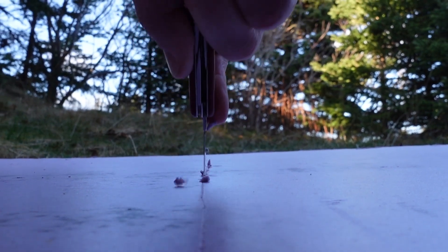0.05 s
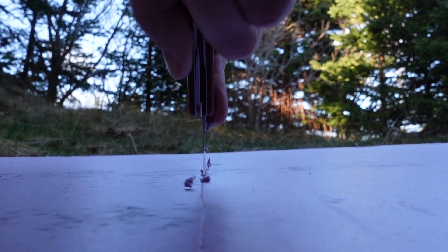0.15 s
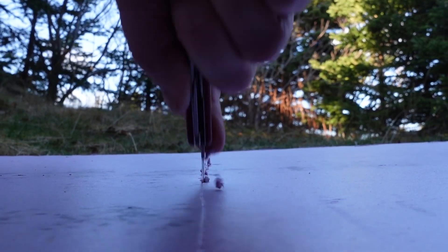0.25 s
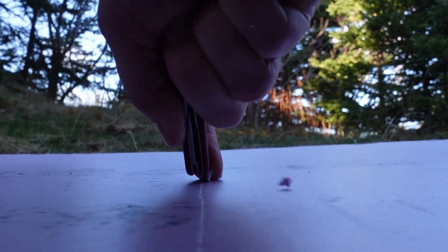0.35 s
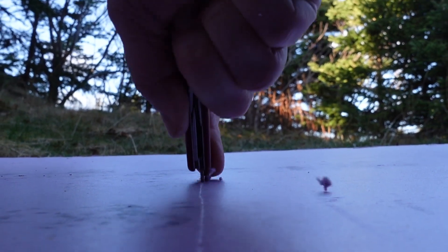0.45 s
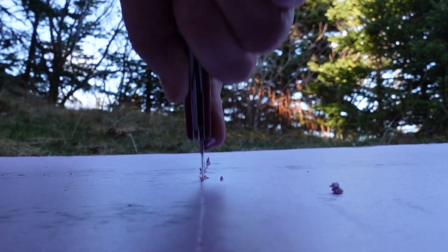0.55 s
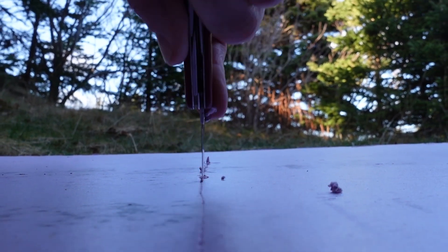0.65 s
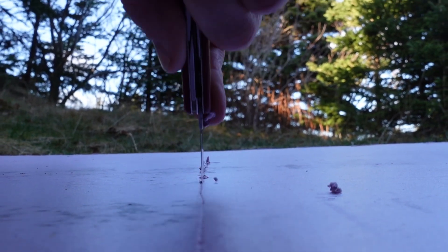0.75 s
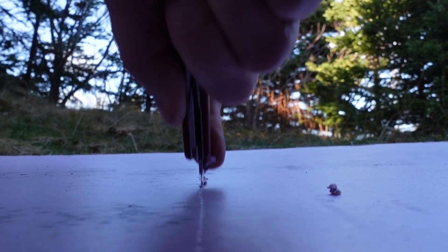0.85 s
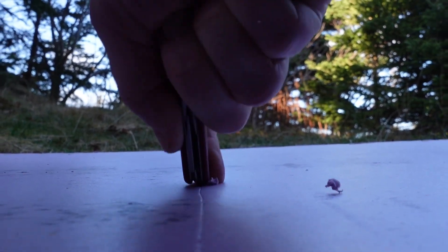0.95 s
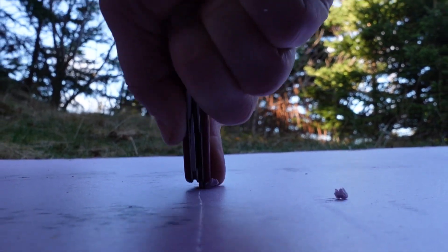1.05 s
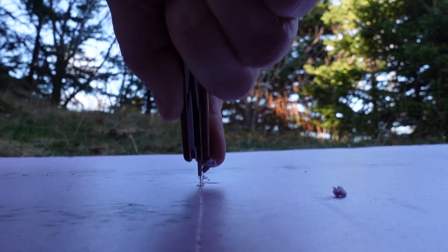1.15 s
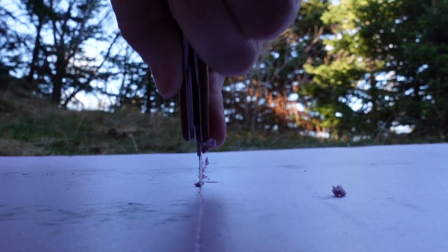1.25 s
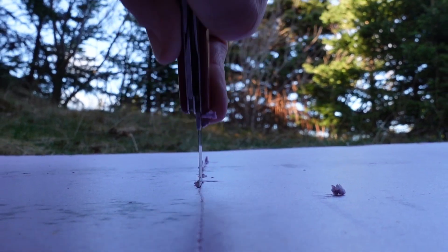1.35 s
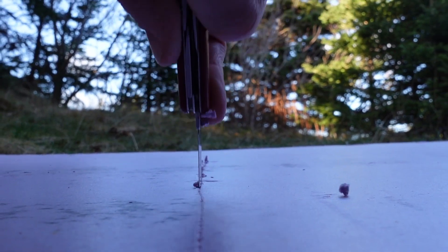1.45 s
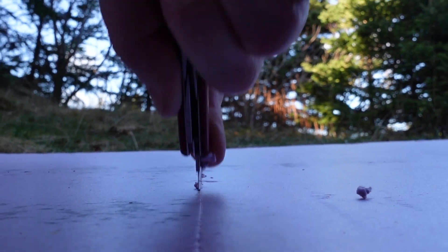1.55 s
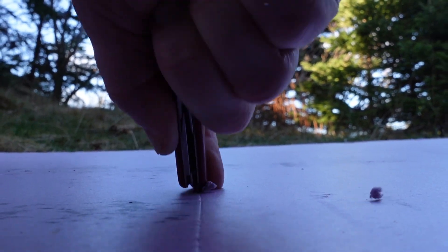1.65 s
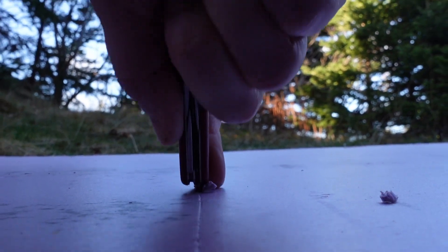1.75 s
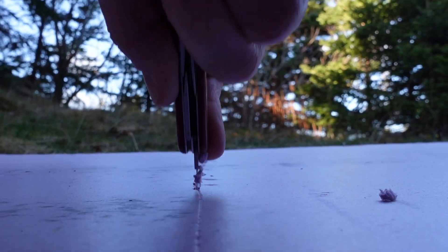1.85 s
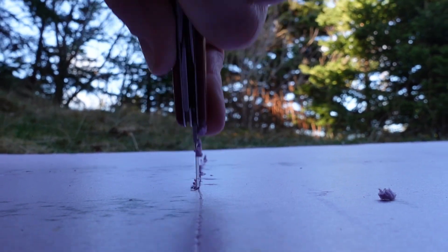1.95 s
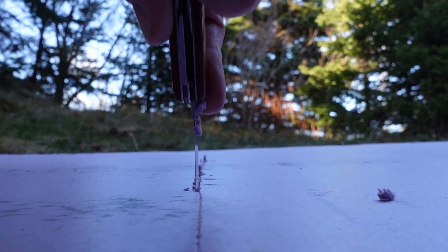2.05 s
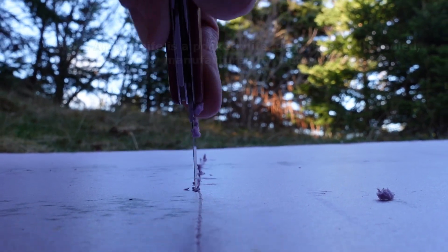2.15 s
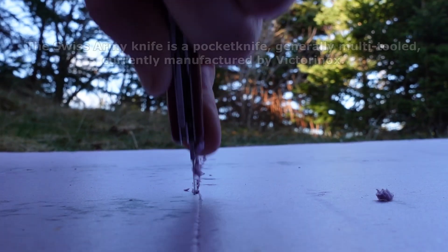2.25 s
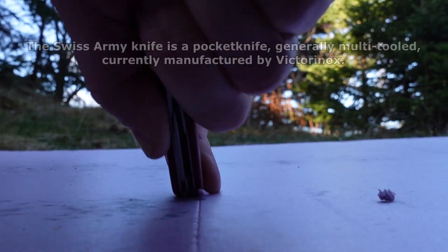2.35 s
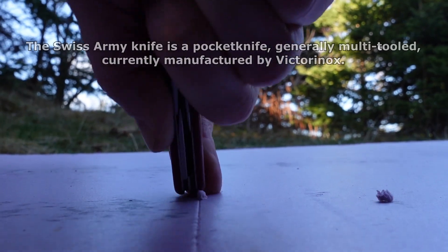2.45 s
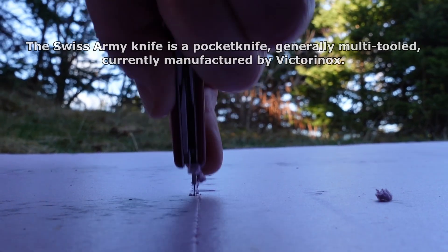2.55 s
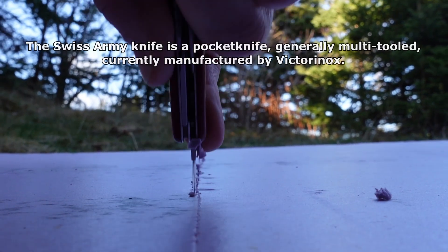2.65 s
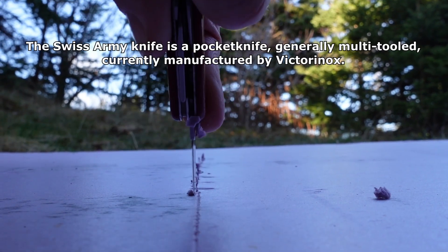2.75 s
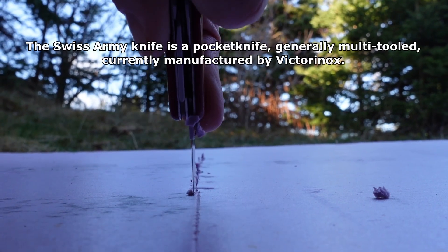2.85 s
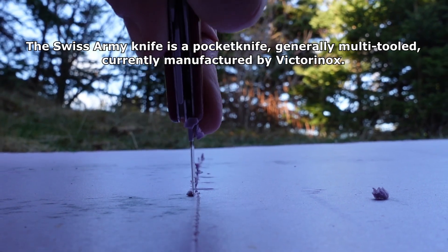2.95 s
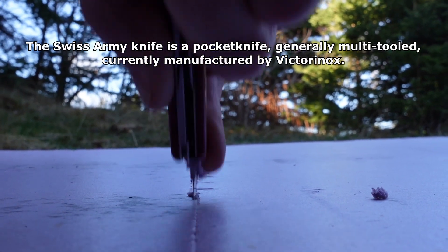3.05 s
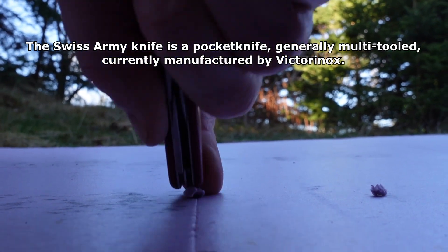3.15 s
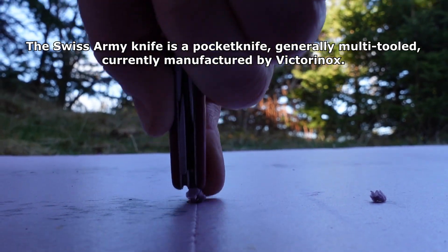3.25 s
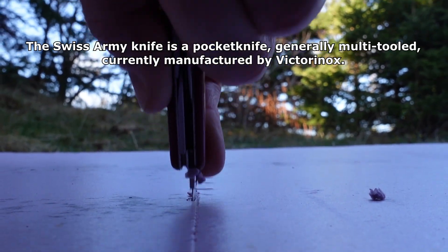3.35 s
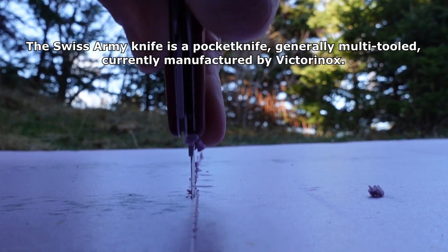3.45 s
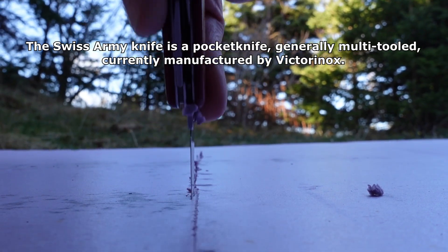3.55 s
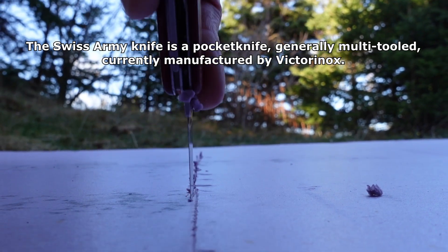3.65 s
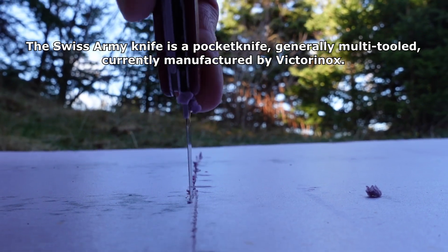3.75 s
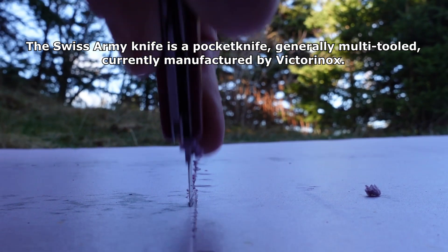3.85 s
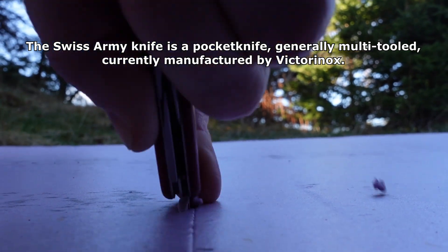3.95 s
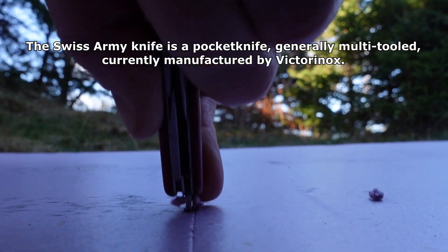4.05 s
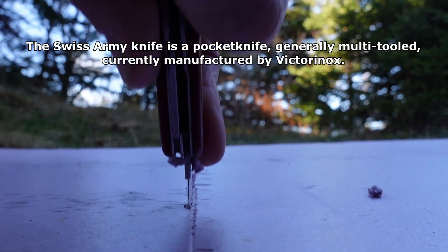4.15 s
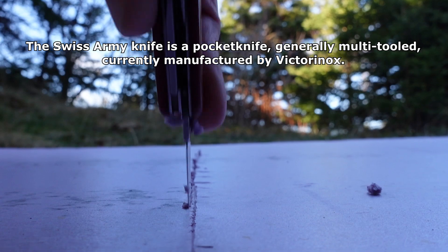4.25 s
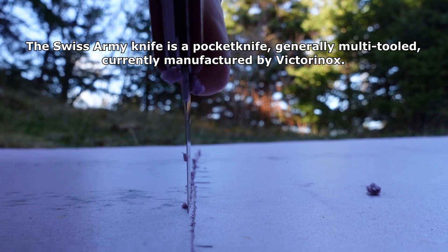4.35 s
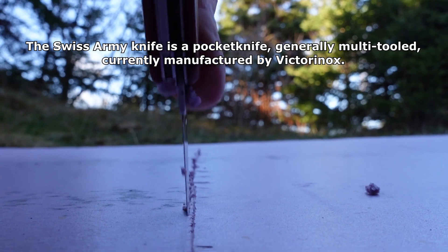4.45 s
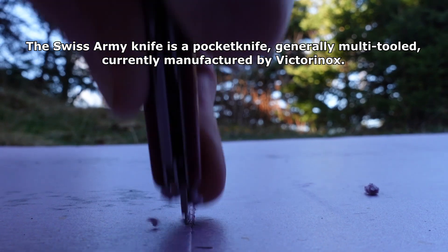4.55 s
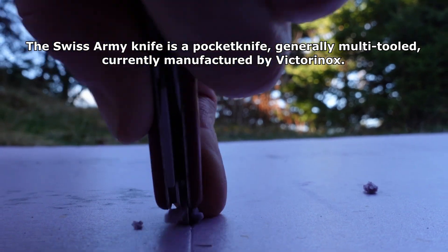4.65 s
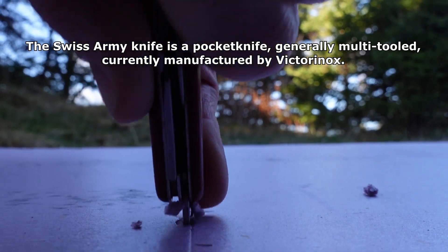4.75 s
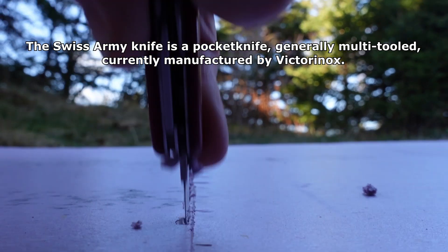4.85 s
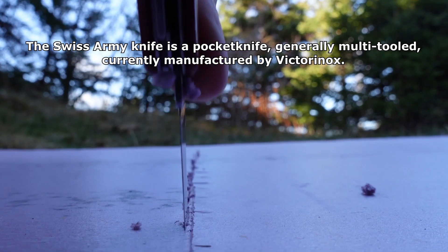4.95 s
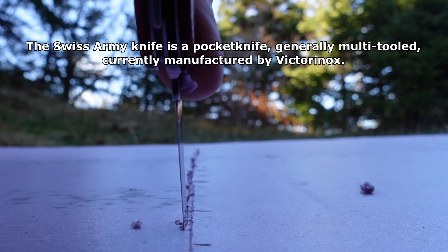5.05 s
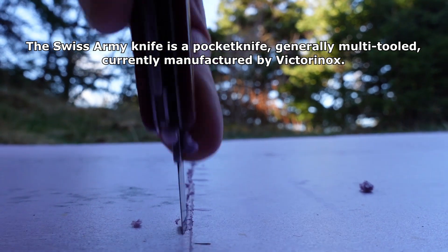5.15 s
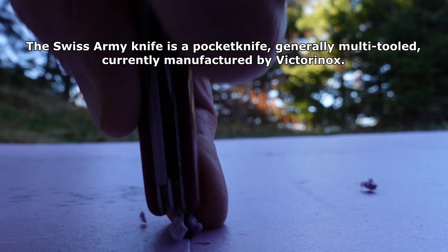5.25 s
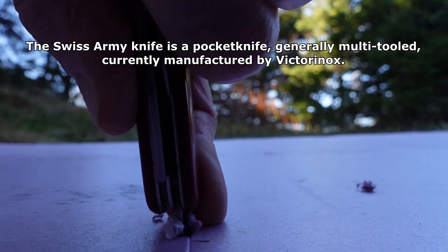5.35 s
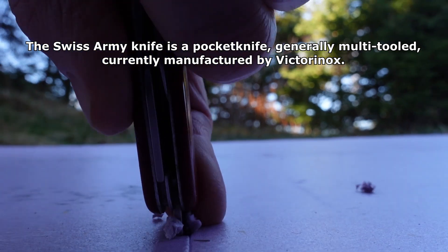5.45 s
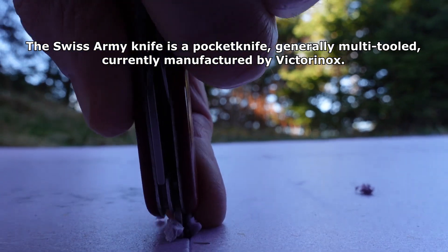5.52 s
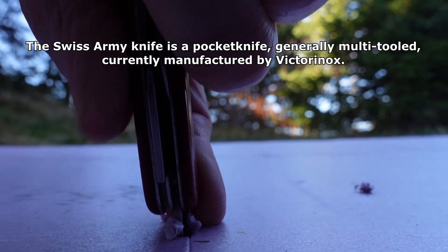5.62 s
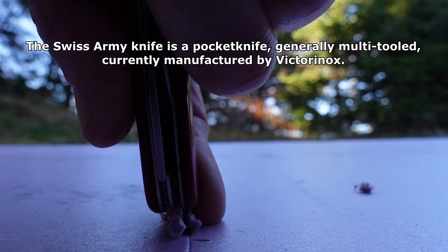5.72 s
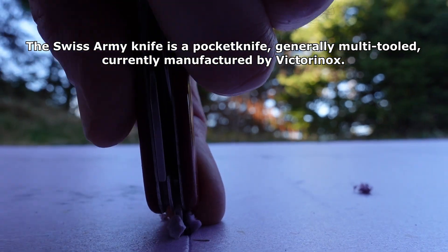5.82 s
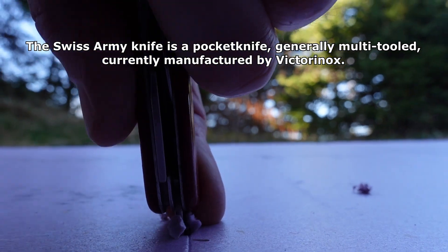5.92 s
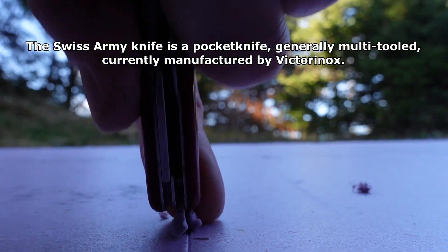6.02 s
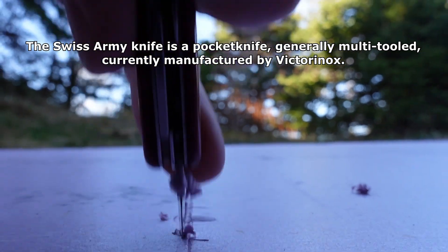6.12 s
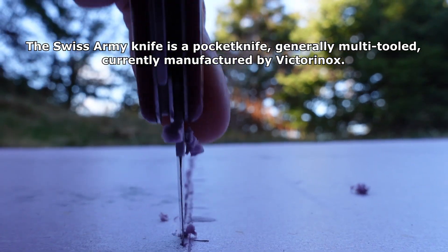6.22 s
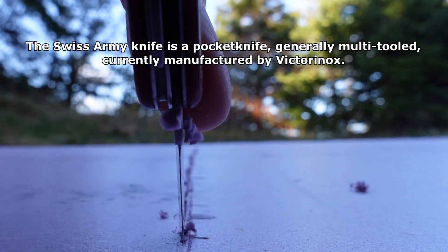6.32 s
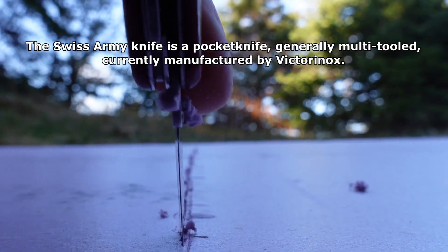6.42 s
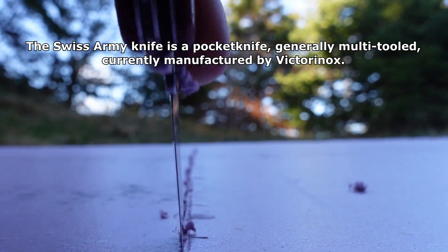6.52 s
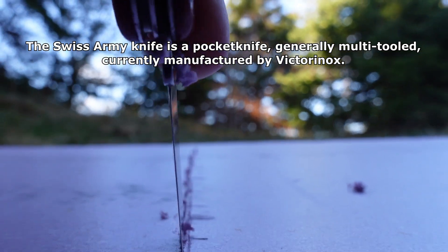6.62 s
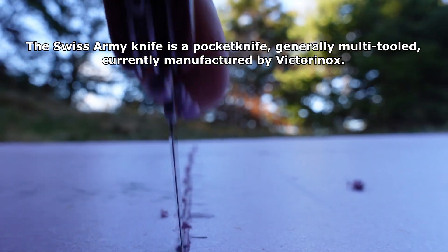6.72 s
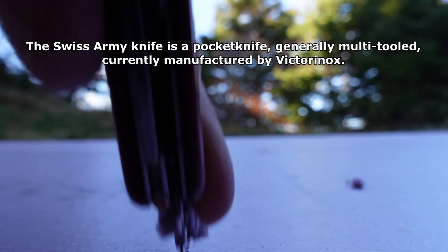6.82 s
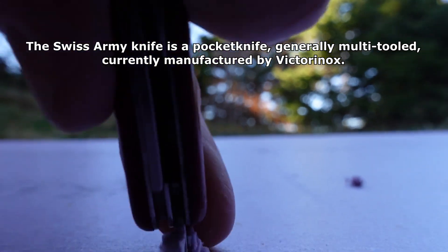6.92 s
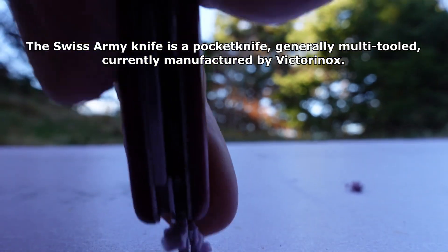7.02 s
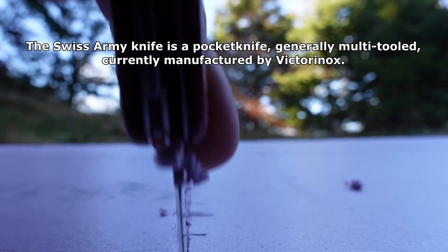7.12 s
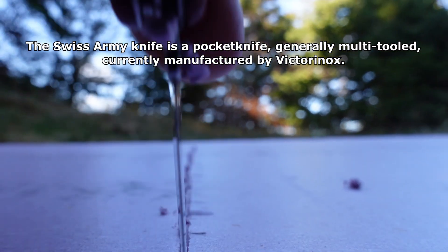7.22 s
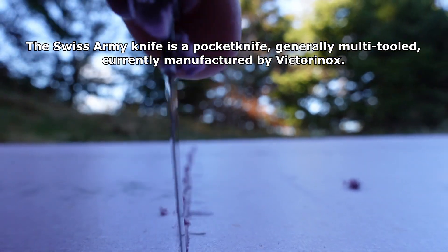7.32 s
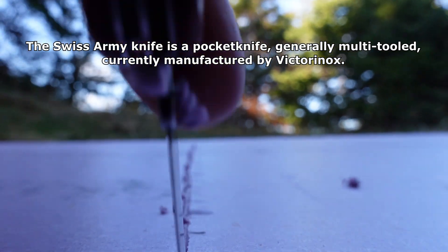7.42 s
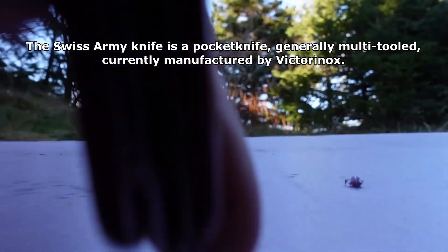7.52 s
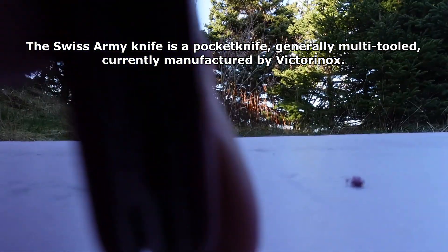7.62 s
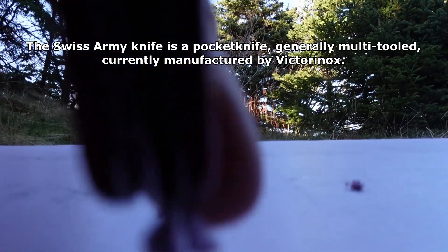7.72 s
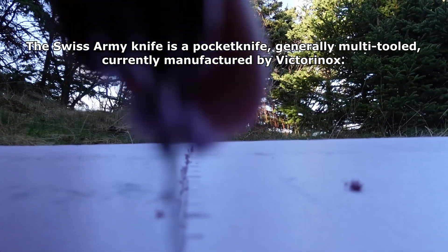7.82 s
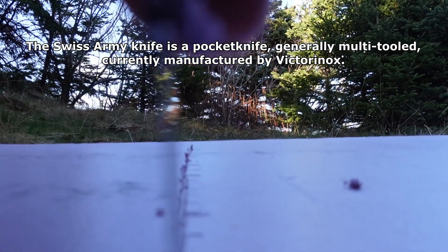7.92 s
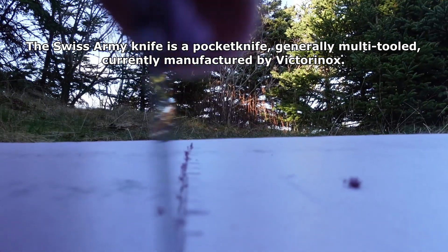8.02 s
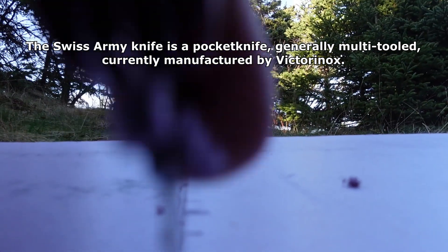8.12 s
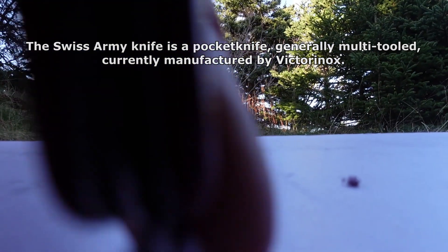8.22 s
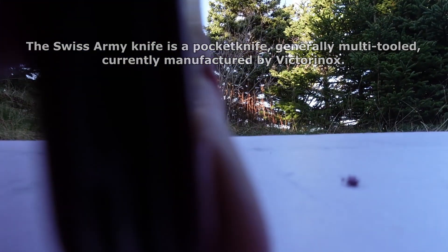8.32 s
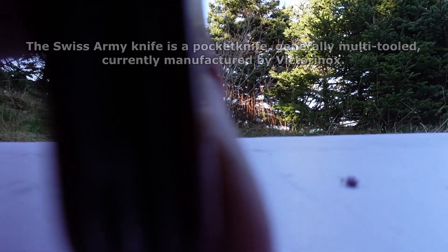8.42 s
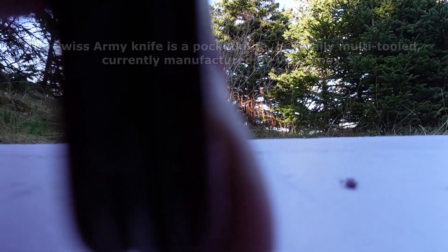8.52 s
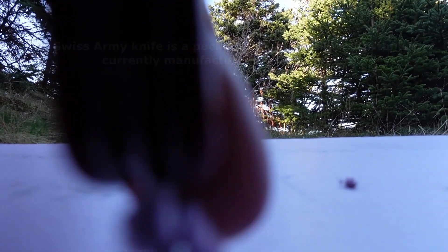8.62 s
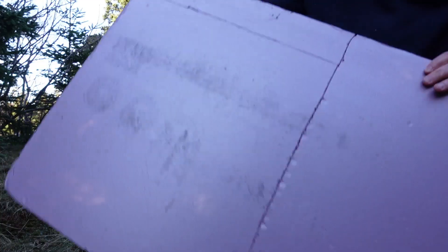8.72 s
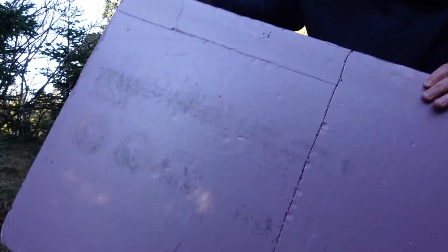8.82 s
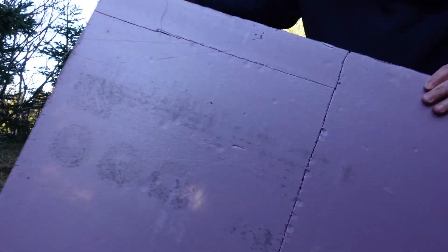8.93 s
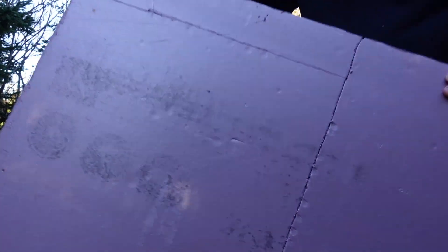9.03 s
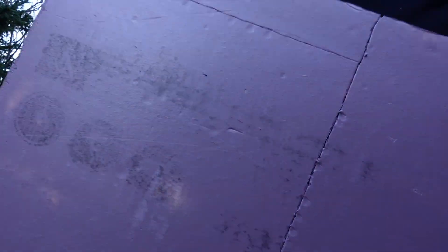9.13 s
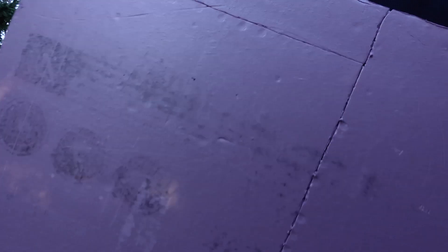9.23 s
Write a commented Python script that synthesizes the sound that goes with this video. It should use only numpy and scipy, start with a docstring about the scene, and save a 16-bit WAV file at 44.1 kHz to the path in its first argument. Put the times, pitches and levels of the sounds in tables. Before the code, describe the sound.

Harsh gritty foam sawing in steady strokes, squeaky at each reversal, pauses once, cracks free, continues nearer, then the board bumps.

```python
"""A pocket knife saws up and down through a rigid foam board, outdoors, working its way towards the microphone.
Each stroke bursts foam cells: uneven clicks and rubbing noise, coloured by the board, make a grating scrape.
As the blade speeds up and slows down it sticks and slips: wavering tones make a gliding squeak.
Noise bursts make snaps of foam, and dying tones make knocks on the board, over still air.
The blade rests once and cracks free; at the end the board is shifted and bumped, and a low drone joins in."""
import sys
import numpy as np
from scipy import signal
from scipy.fft import rfft, irfft, next_fast_len
from scipy.io import wavfile
from scipy.ndimage import uniform_filter1d

SR = 44100
rng = np.random.default_rng(int(sys.argv[2]) if len(sys.argv) > 2 else 0)


def master(y):
    """Save y as 16-bit WAV."""
    cut = np.clip(np.atleast_2d(y).T, -1, 1)
    pcm = np.round(cut * 32767)  # scale
    wavfile.write(sys.argv[1], SR, pcm.astype(np.int16))


N = 409248  # length in samples
TIME = np.arange(N) / SR  # seconds
BINS = np.fft.rfftfreq(4096, 1 / SR)  # Hz at which every filter is drawn

# Strokes of the blade, down and up; the levels are settings before each sound's trims: start t/s,
# speeding-up time/s, end t/s, slowing-down time/s, rasp setting off level/dB, squeal gaining speed level/dB,
# squeal stopping level/dB, scrape early, midway and late level/dB, crunch over scrape/dB, hiss over scrape/dB
STROKES = [(0, 0.012, 0.46, 0.027, -20, -21, -20, -28, -28, -18, -4, -2),
           (0.503, 0.044, 0.779, 0.025, -18.5, -21.5, -24.0, -32.0, -30.5, -23.5, -5.0, 3.5),
           (0.804, 0.03, 1.033, 0.023, -26.5, -19.5, -19.5, -20.5, -22.0, -20.0, -1.5, -2.5),
           (1.086, 0.058, 1.481, 0.014, -17.0, -18.0, -21.0, -29.5, -31.0, -26.0, -4.0, 0.5),
           (1.53, 0.022, 1.76, 0.039, -21.5, -20.0, -17.5, -22.5, -21.5, -19.5, -1.5, -2.0),
           (1.808, 0.058, 2.177, 0.015, -18.5, -19.5, -20.5, -23.0, -30.5, -27.5, -5.0, 1.0),
           (2.214, 0.034, 2.466, 0.039, -24.0, -19.0, -19.5, -20.5, -23.0, -17.5, -3.0, -2.5),
           (2.51, 0.071, 2.871, 0.042, -17, -18.0, -20.0, -23.5, -27.5, -25.5, -5.0, 0.5),
           (3.05, 0.039, 3.234, 0.029, -23.5, -20.0, -21.0, -20.0, -19.5, -18.5, -3.5, -4.0),
           (3.28, 0.081, 3.792, 0.041, -17, -16, -18, -34, -35, -32, -5, 3),
           (3.849, 0.032, 4.049, 0.017, -29.5, -21.5, -20.5, -22.5, -24.0, -23.0, -1.5, -3.0),
           (4.096, 0.05, 4.465, 0.024, -17.0, -17.5, -23.5, -30.5, -33.0, -27.5, -1.5, 0.0),
           (4.511, 0.018, 4.704, 0.021, -24.0, -20.0, -22.0, -25.0, -21.5, -19.5, -2.0, -4.5),
           (4.777, 0.077, 5.086, 0.02, -19, -22, -22.5, -32, -32.5, -31.0, -1.5, 2.0),
           (5.126, 0.031, 5.402, 0.054, -25.5, -21.5, -20.5, -24.0, -24.0, -21.0, -1.5, -3.0),
           (6.049, 0.101, 6.381, 0.032, -19.0, -18.0, -17.0, -27.0, -26.5, -30.0, -3.0, -1.0),
           (6.391, 0.056, 6.676, 0.039, -15, -19, -19, -38, -38, -37, -4, 1),
           (6.752, 0.025, 6.987, 0.015, -26.0, -20.5, -18.5, -21.0, -25.5, -23.0, -5.0, -5.0),
           (7.056, 0.056, 7.353, 0.023, -16, -16, -19.5, -34.5, -33.0, -32.0, -4.0, 0.0),
           (7.428, 0.034, 7.678, 0.06, -28.0, -22.5, -19.0, -26.0, -25.0, -17.0, -2, -2.0),
           (7.741, 0.042, 8.03, 0.035, -16.5, -19.0, -20.0, -33.0, -35.0, -34.0, -4.5, 0.5),
           (8.083, 0.04, 8.434, 0.049, -22.0, -19.0, -16.0, -29.0, -28.0, -30.0, -2.5, -1.0),
           (8.556, 0.092, 8.763, 0.031, -16.0, -18.5, -17.5, -38.0, -32.5, -30.5, -5.0, -2.5)]
# Stray chirps where the blade catches: start t/s, end t/s, start f/Hz, middle f/Hz, end f/Hz,
# first half level/dB, second half level/dB
CHIRPS = [(0.186, 0.195, 9000, 3920, 2590, -23, -23), (.215, 0.224, 3600, 5530, 8950, -17.5, -23),
          (0.566, 0.68, 10300, 10290, 11500, -29.5, -33), (0.63, 0.654, 7400, 6070, 4940, -20, -28),
          (0.669, 0.68, 8750, 8450, 10000, -26, -17.5), (.723, 0.762, 16200, 15100, 10900, -19, -27),
          (2, 2.025, 14800, 14500, 13600, -23, -37), (2.893, 2.939, 560, 760, 1230, -20.5, -33),
          (2.933, 2.978, 754, 1540, 750, -23, -27), (3.168, 3.187, 14470, 11980, 11510, -32, -31),
          (3.288, 3.32, 1047, 1280, 1870, -28, -21), (3.355, 3.417, 4200, 5920, 6540, -18.5, -18.5),
          (3.418, 3.461, 5130, 7600, 8430, -25.5, -28), (3.637, 3.677, 12900, 8260, 7890, -23.5, -18),
          (3.677, 3.72, 8150, 10900, 12000, -20, -28), (4.745, 4.778, 920, 1007, 1460, -28, -20),
          (4.775, 4.817, 736, 1070, 2270, -16.5, -27), (4.832, 4.887, 6440, 7330, 7120, -20.5, -24),
          (6.071, 6.103, 1530, 1767, 2200, -24, -28), (6.142, 6.186, 2180, 8960, 15400, -29, -24),
          (6.485, 6.524, 11550, 6700, 5080, -23.5, -20), (6.52, 6.543, 3800, 6650, 8000, -22, -16.5),
          (7.108, 7.13, 8100, 10540, 13000, -24, -25.5), (8.118, 8.152, 9600, 11700, 13200, -25, -29),
          (8.061, 8.125, 2115, 2300, 2330, -29.5, -33), (8.551, 8.593, 1288, 1385, 1620, -27, -16)]
# slips a second: as the blade sticks, once up to speed, and as it starts to brake
STICK_HZ, SET_OFF_HZ, BRAKE_HZ = 1001.7, 8210, 10330


def amp(db):
    """Turns decibels into gain."""
    return 10 ** (np.asarray(db) / 20)


def evened(x):
    """Scales a sound to rms 1."""
    return x / np.sqrt(np.mean(x ** 2) + 1e-20)


def read(points, hz):
    """Reads a spectrum between its points, on a log-frequency axis."""
    f, value = np.transpose(points)
    return np.interp(np.log(hz + 1), np.log(f + 1), value)


def add(mix, s, sound):
    """Adds a sound to the mix at time s."""
    part = mix[max(round(s * SR), 0):][:len(sound)]
    part += sound[:len(part)]


def power(x, seconds):
    """Running mean square, smoothed twice."""
    size = max(int(seconds * SR), 1)
    once = uniform_filter1d(x ** 2, size)
    return abs(uniform_filter1d(once, size)) + 1e-14


def wander(count, hz):
    """Random drift of about rms 1 that heads for a new value hz times a second."""
    at = np.arange(count) * hz / SR
    knots = rng.standard_normal(int(at[-1]) + 2)
    return np.interp(at, np.arange(len(knots)), knots) * np.sqrt(3 / 2)


def colour(x, gain):
    """Filters with the given gain on BINS, without sounding ahead: it rings only after a click."""
    both_sides = np.r_[gain, gain[-2:0:-1]]
    log_gain = np.log(np.maximum(both_sides, 1e-5))
    taps = np.fft.ifft(np.exp(np.conj(signal.hilbert(log_gain)))).real
    return signal.oaconvolve(x, taps)[:len(x)]


def split(x):
    """Splits into crunch (to 800 Hz), grating (to 3200 Hz) and hiss, which sum to the whole."""
    size = next_fast_len(N)
    z, hz = rfft(x, size), np.fft.rfftfreq(size, 1 / SR)
    low = 1 / (1 + (hz / 800) ** 6)
    middle = 1 / (1 + (hz / 3200) ** 6)
    return [irfft(z * band, size)[:N] for band in (low, middle - low, 1 - middle)]


def ripple(x, echo_db, reach_s=.007, count=7):
    """Echoes inside the sheet comb the sound; their paths change as the cut advances."""
    out = np.zeros(N)
    for k in range(count):
        taps = np.zeros(int(reach_s * SR) + 40)
        taps[rng.integers(30, len(taps), size=12)] = rng.choice([-1, 1], size=12)
        # one set of paths fades into the next
        near = np.sqrt(np.maximum(1 - abs(np.linspace(0, count - 1, N) - k), 0))
        out += near * signal.oaconvolve(x, taps / np.linalg.norm(taps))[:N]
    treble = signal.sosfilt(signal.butter(1, 1200, "high", fs=SR, output="sos"), out)
    return (x + amp(echo_db) * treble) / np.sqrt(1 + amp(echo_db) ** 2)


def background(air_db=-56.5, drone_hz=106.7, drone_db=-44.5):
    """Still air as coloured noise, and an unsteady low sine drone while the board is held up."""
    # still air outdoors: f/Hz, level per Hz/dB, before evening
    air_spectrum = [(20, 7), (50, -15), (110, -5), (300, -8), (1000, -35), (4000, -10), (16000, -33)]
    drone = evened(np.sin(2 * np.pi * drone_hz * TIME)) * amp(drone_db + 1.5 * wander(N, 15))
    air = evened(colour(rng.standard_normal(N), amp(read(air_spectrum, BINS))))
    return amp(air_db) * air + drone * np.interp(TIME, [8.8, 9.0], [0, 1])


def knocks(level_db=-2.0, boom_db=3., boom_hz=104, boom_t60=0.33):
    """A blow rings the board's short modes as dying tones, and the whole sheet booms a little longer."""
    # blows on the board, before the two trims above: t/s, ring peak level/dB, boom of the whole sheet level/dB
    blow_table = [(0.983, -4.5, -35), (1.702, -6.5, -31.5), (2.404, -7.5, -30.5), (3.19, -8.5, -37),
                  (4.015, -6, -32.5), (5.322, -12, -34.5), (5.715, -7.5, -49), (8.954, -7.5, -27)]
    # what the struck board rings with, pitch before a small random change: f/Hz, level/dB, time to fall 60 dB/s
    mode_table = [(184.7, -6, 0.15), (264, -2.5, 0.12), (306, -5.5, 0.053), (414, -11, 0.06),
                  (551, -5, 0.12), (625, -14, 0.023), (880, -20, .05)]
    out, t = np.zeros(N), np.arange(SR // 2) / SR
    for s, db, sheet_db in blow_table:
        ring = np.zeros(len(t))
        for hz, mode_db, t60 in mode_table:
            struck_hz = hz * rng.uniform(0.92, 1.04)
            ring += amp(mode_db - 60 * t / t60) * np.cos(2 * np.pi * struck_hz * t)
        boom = amp(sheet_db + boom_db - 60 * t / boom_t60) * np.sin(2 * np.pi * boom_hz * t)
        add(out, s, amp(db + level_db) * ring / abs(ring).max() + boom)
    return out


def snaps(t60=0.011, octaves=1.78):
    """A wall of cells gives way: a noise burst round one pitch, a sharp crack that dies at once."""
    # single snaps of foam: t/s, peak level/dB, centre f/Hz
    snap_table = [(0.98, -5, 1100), (1.699, -5, 635), (2.402, -7, 616), (2.472, -12, 1560),
                  (2.916, -7, 856), (2.929, -12, 1550), (3.193, -5, 1200), (3.245, -31, 2220),
                  (3.26, -26, 1060), (4.014, -9, 519), (4.805, -9, 1740), (4.816, -12, 746),
                  (5.321, -6, 390), (5.445, -18, 1660), (5.502, -17, 1650), (5.528, -18, 1640),
                  (5.552, -22.5, 1620), (5.572, -37, 1660), (5.672, -12, 1810), (5.681, -8, 1210),
                  (5.703, -15, 900), (5.73, -10.5, 417), (8.773, -9, 8790), (8.863, -10.5, 520),
                  (9.105, -34, 571)]
    out, t = np.zeros(N), np.arange(len(BINS)) / SR
    for s, db, hz in snap_table:
        burst = rng.standard_normal(len(t)) * amp(-60 * t / t60)
        distance = np.log2((BINS + 1) / hz) / octaves
        crack = colour(burst, 1 / (1 + distance ** 2) ** 2)
        add(out, s, amp(db) * crack / abs(crack).max())
    return out


def rising(t, start, rise):
    """Slip rate in Hz as the blade sets off: the hand pushes harder and harder."""
    run_up = np.maximum(t - start, 0) / rise
    return STICK_HZ + (SET_OFF_HZ - STICK_HZ) * run_up ** 2.25  # most speed is gained late


def falling(t, end, fall):
    """Slip rate in Hz as the blade brakes evenly."""
    return STICK_HZ + (BRAKE_HZ - STICK_HZ) * np.maximum(end - t, 0) / fall


def squeak(start, end, hz0, hz1, hz2, db0, db1, jitter=0.0353, loose_hz=2400, shimmer_db=4.5,
           overtone_db=-12.5, fall_db=-9.0, rival_db=-7.5, rival_ratio=1.32, spray_db=-16.0, spray_hz=1800):
    """Stick-slip: wavering tones whose rate follows the blade's speed; slow slips are the least regular."""
    u = np.linspace(0, 1, max(int((end - start) * SR), 64))
    # a smooth curve through the start, middle and end rates
    glide = hz0 * (1 - u) * (1 - 2 * u) + 4 * hz1 * u * (1 - u) + hz2 * u * (2 * u - 1)
    glide = np.maximum(glide, 500)
    loose = np.minimum(loose_hz / glide, 1.6)
    rival = rival_ratio * rng.uniform(.9, 1.1)
    tone = np.zeros(len(u))
    # each flank of the blade slips at a rate of its own
    for ratio, gain in ((1, 1), (rival, amp(rival_db) * np.sqrt(loose))):
        unsteady = wander(len(u), 1519) + 0.795 * wander(len(u), 284.8)
        hz = glide * ratio * np.exp(jitter * loose * unsteady)
        phase = 2 * np.pi * np.cumsum(hz) / SR
        spray = amp(spray_db) * loose * wander(len(u), spray_hz)  # rough noise beside the tone
        slips = np.sin(phase) + spray * np.cos(phase)
        for k in range(2, 5):
            overtone = amp(overtone_db + fall_db * np.log2(k - 1) + shimmer_db * wander(len(u), 224))
            slips += overtone * np.sin(k * phase) * (k * hz < SR / 2)
        tone += gain * slips * (hz < SR / 2) * amp(shimmer_db * wander(len(u), 451.0))
    level = amp(np.interp(u, [1 / 4, 3 / 4], [db0, db1]))
    return start, level * evened(tone) * signal.windows.tukey(len(u), .2)


def squeaks(low_db=-1.5, high_db=0.5, clean_db_per_octave=2.5, brake_high_db=-8.0, brake_low_db=-2.0,
            rise_reach=1.06, fall_reach=1.3):
    """Each stroke squeaks upward setting off, weaker on a quick start, and downward stopping; chirps join in."""
    out = np.zeros(N)
    for start, rise, end, fall, rasp_db, squeal_db, stop_db, *_ in STROKES:
        clean = clean_db_per_octave * min(np.log2(rise / .05), 0)
        t = start + rise_reach * rise * np.array([0, .5, 1])
        levels = rasp_db + low_db + clean, squeal_db + high_db + clean
        add(out, *squeak(t[0], t[-1], *rising(t, start, rise), *levels))
        t = end - fall_reach * fall * np.array([1, .5, 0])
        levels = stop_db + brake_high_db, stop_db + brake_low_db
        add(out, *squeak(t[0], t[-1], *falling(t, end, fall), *levels))
    for chirp in CHIRPS:
        add(out, *squeak(*chirp))
    return out


def contact(t, start, end, grip_db=3, grip_db_per_s=601, let_go_db_per_s=1102):
    """The blade creeps, gives with a jump in level, and dies away when it stops; in dB."""
    creep = np.maximum(start - t, 0)
    before = -grip_db * (creep > 0) - grip_db_per_s * creep
    return before - let_go_db_per_s * np.maximum(t - end, 0)


def sawing():
    """Crunch, grating and hiss in dB: a slow blade rasps and squeals, a fast one scrapes steadily."""
    # what the blade's speed does to the levels of a stroke:
    # slip rate f/Hz, crunch of the slipping/dB, its grating/dB, its hiss/dB, steady scrape/dB
    speed_table = [(940, -14.5, -5, -13.5, -28), (1540, -15.5, 0, -7, -16), (2780, -37, -2.5, -4.5, -14.5),
                   (5600, -47, -19, 0, -16), (8300, -40, -28, -3, -13), (11340, -33, -25, -13.5, -6),
                   (16300, -35, -25, -15.5, -3.5), (43200, -60, -60, -52, 0.16)]
    # the blade held in the foam: crunch, grating and hiss level/dB
    resting_db = [-55, -52, -55]
    # the blade judders at a turn: start t/s, length/s, crunch, grating and hiss level/dB
    judder_table = [(2.91, 0.022, -32, -20.5, -27.5), (2.931, 0.042, -37, -18, -26),
                    (4.758, 0.069, -27, -22.5, -28.5), (6.385, .016, -39, -27, -27)]
    # the blade stalls, cracks free and creeps on: t/s, crunch, grating and hiss level/dB
    stall_curve = [(5.426, -45, -43, -51), (5.442, -39, -37, -41), (5.5, -42.5, -39.5, -42),
                   (5.647, -54, -67, -86), (5.693, -32, -32, -41), (5.725, -21, -29.5, -33.5),
                   (5.761, -37.5, -27, -31), (5.887, -38.5, -29, -33), (5.956, -41.5, -35.5, -41.5),
                   (6.055, -38, -28, -28)]
    # the board is shifted and rubs along: t/s, crunch, grating and hiss level/dB
    shift_curve = [(8.769, -42, -36, -27.5), (8.83, -35, -28.5, -26), (8.855, -36, -35.5, -33),
                   (8.865, -22, -22.5, -26.5), (8.892, -35, -29.5, -20), (8.93, -39, -33, -29.5),
                   (8.954, -28, -30.5, -33), (8.962, -12.5, -31, -41), (8.982, -26, -35, -29.5),
                   (9.039, -40, -39.5, -45), (9.201, -35.5, -32.5, -26.5), (9.279, -41, -30, -22)]
    work = amp(resting_db)[:, None] ** 2 * np.ones(N)
    slip_hz, *responses = np.transpose(speed_table)
    for (start, rise, end, fall, rasp_db, squeal_db, stop_db,
         early_db, mid_db, late_db, crunch_db, hiss_db) in STROKES:
        near = (TIME > start - .06) & (TIME < end + .06)
        t = TIME[near]
        up, down = rising(t, start, rise), falling(t, end, fall)
        log_rate = np.log(np.minimum(up, down))
        *slipping, steady = [np.interp(log_rate, np.log(slip_hz), db) for db in responses]
        setting_off = [[rasp_db], [rasp_db], [squeal_db]]
        slipping = np.array(slipping) + np.where(up < down, setting_off, stop_db)
        push = np.interp(t, np.linspace(start + rise, end - fall, num=3), [early_db, mid_db, late_db])
        steady = steady + push + np.array([[crunch_db], [0], [hiss_db]])
        work[:, near] += (amp(slipping) ** 2 + amp(steady) ** 2) * amp(contact(t, start, end)) ** 2
    for start, length, *bands in judder_table:
        fade_db = np.maximum(contact(TIME, start, start + length), -100)
        work += np.outer(amp(bands), amp(fade_db)) ** 2
    # a chirp brings friction noise, 2 dB below it, into the band of its middle pitch
    for start, end, _, hz, _, *halves in CHIRPS:
        near = (TIME > start) & (TIME < end)
        band = np.searchsorted([800, 3200], hz)
        work[band, near] += amp(np.linspace(*halves, num=near.sum()) - 2) ** 2
    for curve in (stall_curve, shift_curve):
        s, *bands = np.transpose(curve)
        near = (TIME > s[0] - .06) & (TIME < s[-1] + .06)
        t = TIME[near]
        fade_db = contact(t, s[0], s[-1])
        work[:, near] += amp([np.interp(t, s, db) + fade_db for db in bands]) ** 2
    return 10 * np.log10(work)


def cells(effort_db, crunch_db, per_s=2600, usual_db=-22.5, thinning=.3, spread_db=2.5, rub_db=2.5,
          rub_slope=0.19, clump_db=1.37, clump_hz=330):
    """Foam cells burst as uneven clicks over smooth rubbing: sparse when the blade creeps, dense when it bites."""
    rate = per_s * np.minimum(amp(2 * thinning * (effort_db - usual_db)), 1)
    sizes = amp(spread_db * np.minimum(rng.exponential(1, N), 4.5)) * rng.choice([-1, 1], N)
    bursts = evened(sizes * (rng.random(N) < rate / SR) / np.sqrt(rate))
    rub = amp(rub_db - rub_slope * (crunch_db - effort_db + 6.5)) * np.sqrt(rate / per_s)
    mix = (bursts + rub * rng.standard_normal(N)) / np.sqrt(1 + rub ** 2)
    return mix * amp(clump_db * wander(N, clump_hz))


def sheet(spectrum, peaks, peaks_db):
    """Gain of the board at one place: a broad slope with resonances standing on it."""
    rings = 0
    for hz, width, db in peaks:
        rings = rings + amp(db + peaks_db) ** 2 / (1 + (2 * (BINS - hz) / width) ** 2) ** 2
    return np.sqrt(amp(read(spectrum, BINS)) ** 2 + rings)


def board_places():
    """Gains of the board in order of time: the cut comes closer, then the board is shifted."""
    # colour from far off to closest, one after the stall, one of the shifted board: f/Hz, level per Hz/dB
    far, halfway, restart = [(29, -64), (50, -25.5), (203, -3), (398, -7), (572, -1.5), (863, -3),
                             (1100, -2.5), (1360, -6), (1580, 1), (1740, -6.5), (5020, -6), (11100, -19.5),
                             (13500, -28), (14500, -22), (16000, -24)], [(29, -65), (50, -29), (171, 0.5), (428, 2.5), (729, 6), (997, -1),
                                          (1150, 0), (1910, -1), (2210, -11), (2880, -6.5), (3250, -9.5),
                                          (4790, -10), (5400, -10.5), (9180, -12.5), (16000, -26)], [(29, -46), (50, -35), (145, -14), (229, -17),
                                                           (264, -6), (337, -16), (408, -8), (559, -9),
                                                           (661, -7), (2320, -5.5), (4900, -16),
                                                           (10600, -21), (16000, -37)]
    close, closest, shifted = [(29, -56), (50, -27), (240, -6), (507, -2), (586, -2.5), (661, -1),
                               (1070, -7.5), (1470, -1), (2320, -11.5), (2950, -7.5), (3330, -14),
                               (4240, -8), (4560, -11), (9180, -9), (16000, -21.5)], [(29, -57), (50, -32), (483, -2.5), (842, -5), (1100, -8.5),
                                              (1470, 3), (1780, -8.5), (2270, -6.5), (3250, -14.5),
                                              (4670, -8), (5670, -11), (8340, -10.5), (12000, -19),
                                              (13800, -19), (16000, -21)], [(29, -46), (50, -4), (98, -4), (246, -7),
                                                               (277, -4.5), (520, 2), (1270, -8.5),
                                                               (1820, -10.5), (2160, -12.5), (6870, -9.5),
                                                               (11700, -20), (16000, -37)]
    # resonances of the sheet along the cut, before the trim given to sheet(): f/Hz, width/Hz, level/dB
    far_peaks, halfway_peaks = [(246, 48, -3), (587, 51, -2.5), (1165, 120, 1), (2870, 110, -8.5),
                                (4950, 970, -8.5)], [(800, 170, -3), (1206, 28, -18), (2200, 185, 1),
                                                   (3360, 33, -1), (3780, 150, -31), (4780, 250, -10),
                                                   (7270, 260, -11)]
    close_peaks, closest_peaks = [(640, 53, -6), (1560, 220, 0.5), (1940, 61, -9), (2930, 220, -6.5),
                                  (3530, 67, -17), (4330, 54, -7), (6200, 57, -12), (7700, 220, -3),
                                  (9100, 110, -8)], [(517, 51, -2.5), (1470, 150, -10), (2290, 160, 1),
                                                       (3490, 61, -32), (4680, 150, -2), (8300, 380, -4),
                                                       (10200, 32, -11), (10900, 51, -4)]
    boom = [(108, 26, -15.0)]  # the whole sheet, same columns
    return [sheet(far, list(far_peaks) + boom, 0.43), sheet(halfway, list(halfway_peaks) + boom, 0.43),
            sheet(restart, [], 0), sheet(close, close_peaks, -1.5),
            sheet(closest, closest_peaks, -3.5), sheet(shifted, boom, 0.23)]


def scrape(spent, drain=1.0, least=0.12, dull=0.71, top_hz=9000):
    """Bursting cells sound through the board; work spent on squeaks and blows is missing from the scrape."""
    # the colour changes between each pair: t/s
    change_times = [2.3, 3.9, 5.35, 5.45, 6.05, 6.2, 7.2, 7.6, 8.74, 8.79]
    levels = sawing()
    effort_db = 10 * np.log10(sum(amp(db) ** 2 for db in levels))
    drive = cells(effort_db, levels[0])
    place = np.interp(TIME, change_times, np.arange(1, len(change_times) + 1) // 2)
    noise = np.zeros(N)
    for k, gain in enumerate(board_places()):
        nearness = np.maximum(1 - abs(place - k), 0)
        noise += nearness * evened(colour(drive, gain))
    noise = ripple(noise, echo_db=-10.0, count=14)
    # a slow blade grates more than it hisses, and loses the top of its fizz
    mellow = signal.sosfiltfilt(signal.butter(3, top_hz, fs=SR, output="sos"), noise)
    noise = mellow + (noise - mellow) * amp(dull * np.clip(levels[2] - levels[1] + 3, -14, 4))
    trims_db, flutters_db = [-.3, .1, .1], [1.5, 1.1, .4]  # crunch, grating, hiss
    out = np.zeros(N)
    for band, other, db, trim_db, flutter_db in zip(split(noise), split(spent), levels, trims_db, flutters_db):
        work = amp(db + trim_db) ** 2
        share = np.maximum(1 - drain * power(other, 0.0098) / work, least)
        level = np.sqrt(work * share / power(band, 0.037))
        out += band * level * amp(flutter_db * wander(N, 110))
    return out


def stereo(events, air, side_db=-1.8, echo_db=2.5, echo_s=0.0032):
    """Two close capsules hear the long cut slightly differently; the bass stays in the middle."""
    # width of the sound, before the trim side_db: f/Hz, side over middle level/dB
    width_points = [(120, -30), (280, -18), (600, -20), (1300, -15.5), (3000, -10.5), (15000, -8.5)]
    # lean of the capsules: f/Hz, left over right level/dB
    lean_points = [(1200, 0), (2400, .8), (4400, .2), (8000, 1.6), (14000, -.4)]
    middle = events + scrape(events) + air
    echo = np.interp(TIME - echo_s, TIME, events)
    side = scrape(events) + amp(echo_db) * echo  # a second, independent scrape
    side = colour(side, amp(read(width_points, BINS) + side_db))
    side = signal.sosfilt(signal.butter(3, 150, "high", fs=SR, output="sos"), side)
    lean = amp(read(lean_points, BINS) / 2)
    return np.array([colour(middle + side, lean), colour(middle - side, 1 / lean)])


def scene():
    """Squeaks, scrape, snaps and knocks all radiate from the board."""
    events = ripple(squeaks(), echo_db=-5.0) + snaps() + knocks()
    return stereo(events, background())


def record(dry, low_cut_hz=74, edge_hz=16100):
    """The microphone sheds deep bass, the loudest peaks are rounded off; then the top is cut at edge_hz."""
    thin = signal.sosfilt(signal.butter(2, low_cut_hz, "high", fs=SR, output="sos"), dry)
    rounded = thin / (1 + (thin / .75) ** 4) ** (1 / 4)
    low_pass = signal.firwin(511, edge_hz, window=("kaiser", 9), fs=SR)
    return signal.oaconvolve(rounded, low_pass[None], "same")


dry = scene()
out = record(dry)
master(out)
```